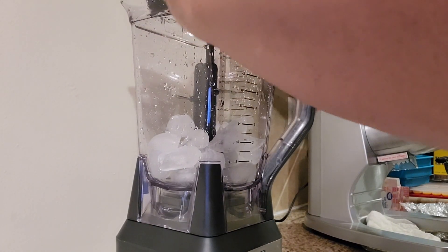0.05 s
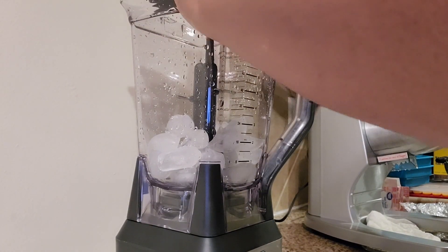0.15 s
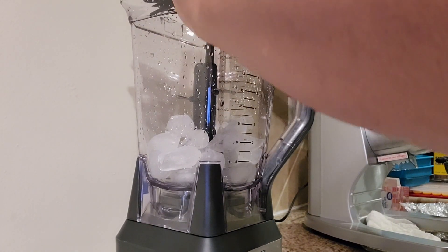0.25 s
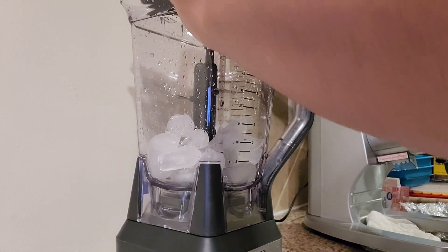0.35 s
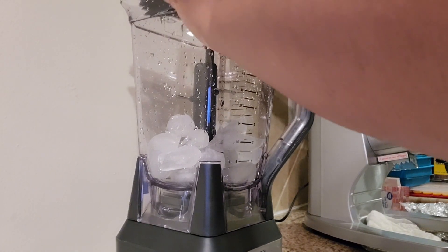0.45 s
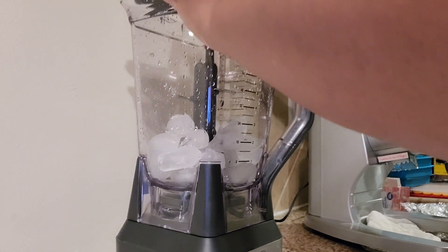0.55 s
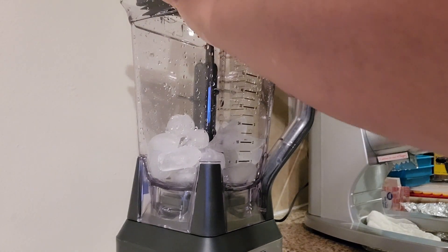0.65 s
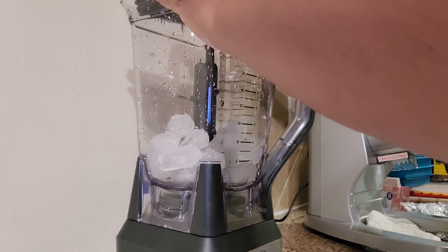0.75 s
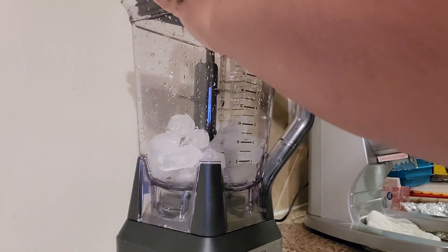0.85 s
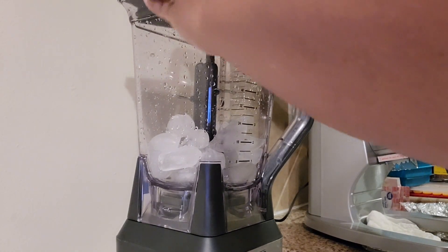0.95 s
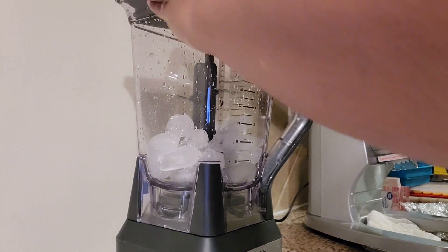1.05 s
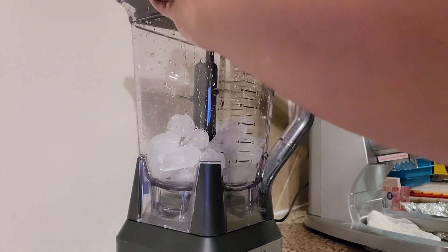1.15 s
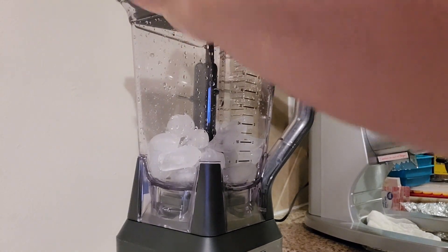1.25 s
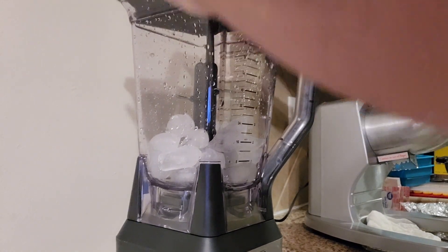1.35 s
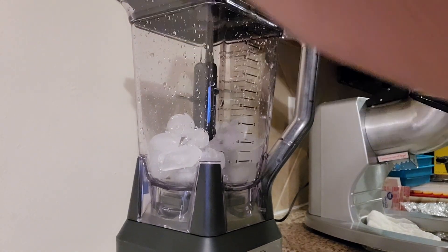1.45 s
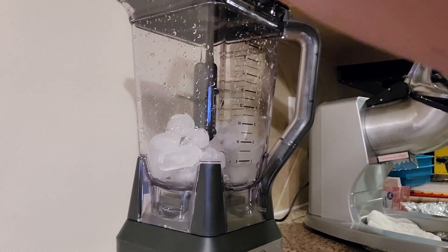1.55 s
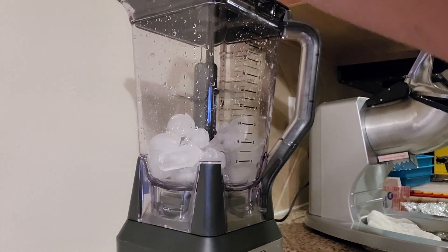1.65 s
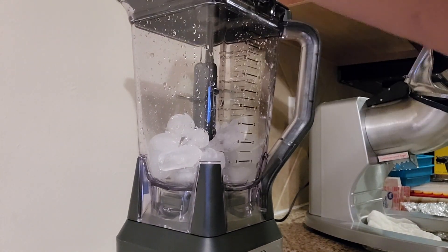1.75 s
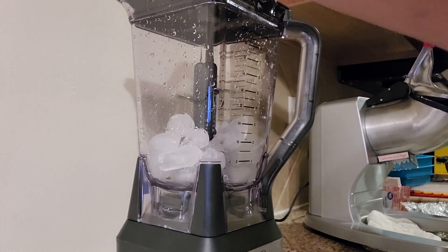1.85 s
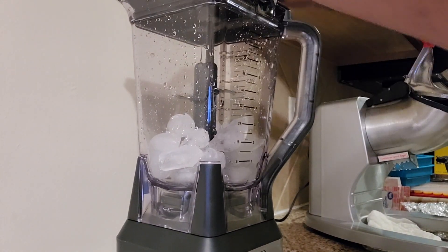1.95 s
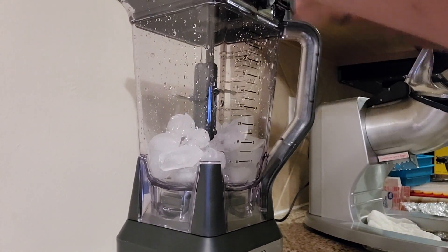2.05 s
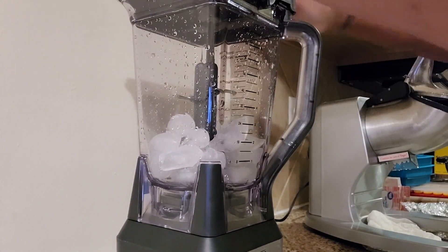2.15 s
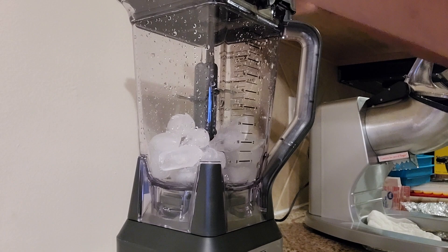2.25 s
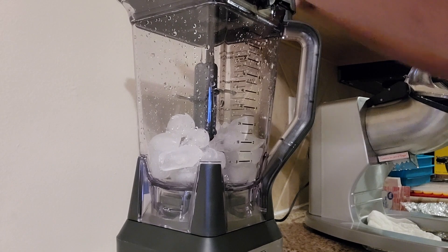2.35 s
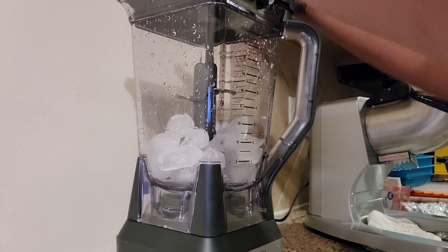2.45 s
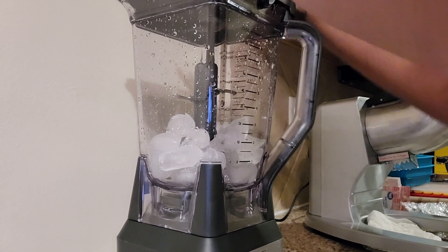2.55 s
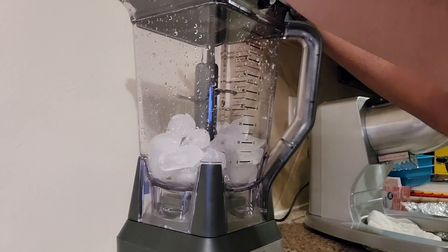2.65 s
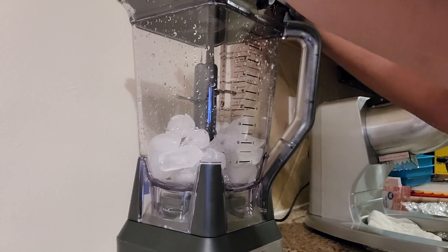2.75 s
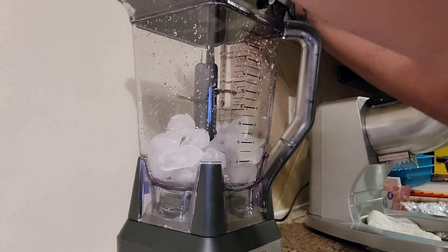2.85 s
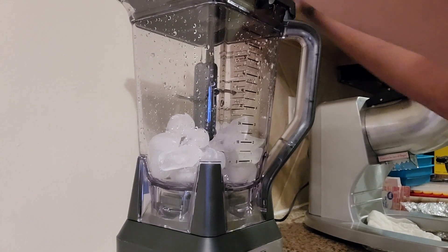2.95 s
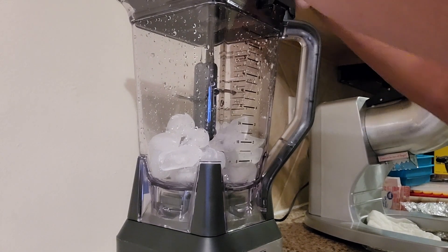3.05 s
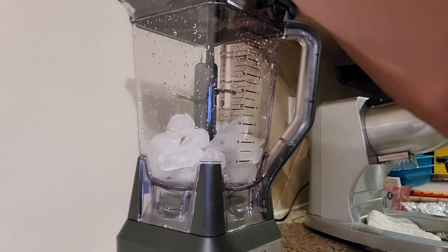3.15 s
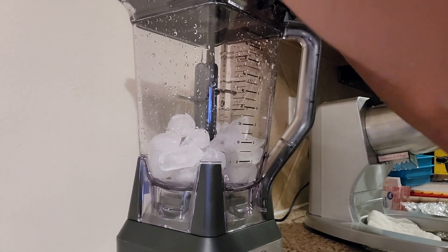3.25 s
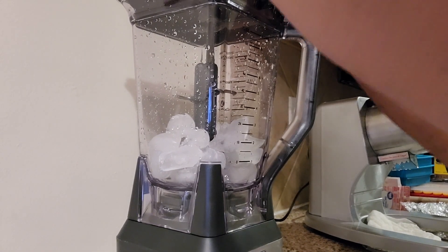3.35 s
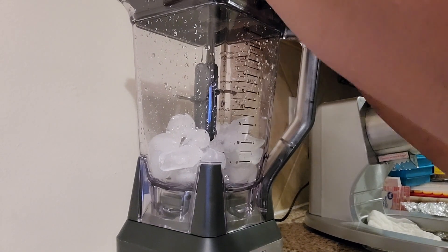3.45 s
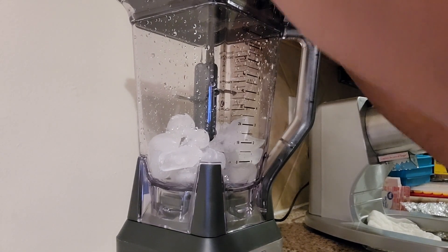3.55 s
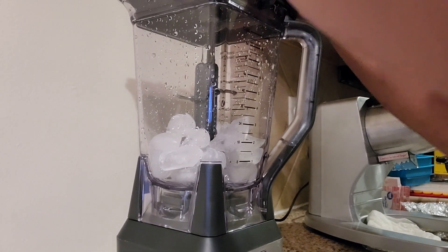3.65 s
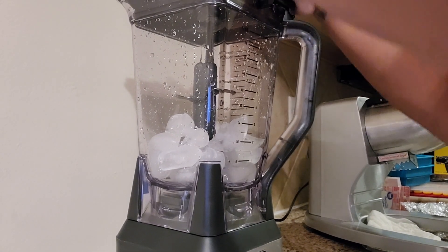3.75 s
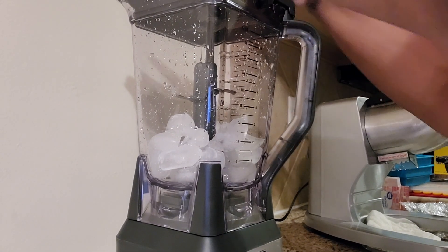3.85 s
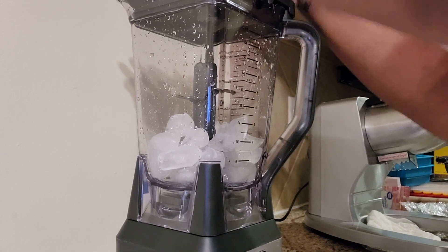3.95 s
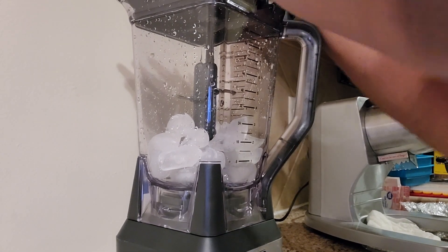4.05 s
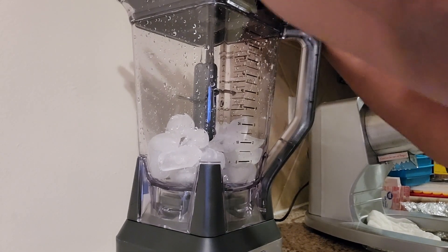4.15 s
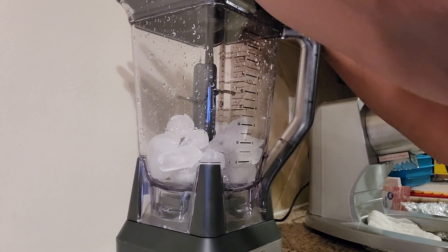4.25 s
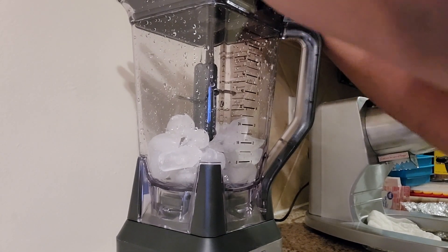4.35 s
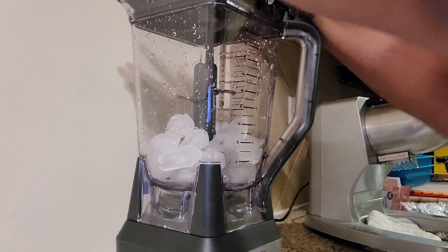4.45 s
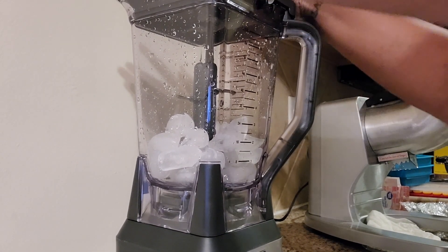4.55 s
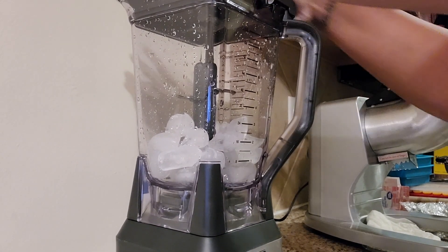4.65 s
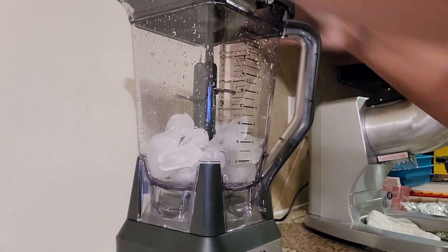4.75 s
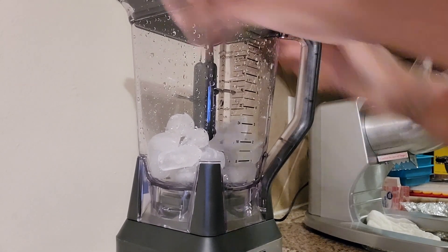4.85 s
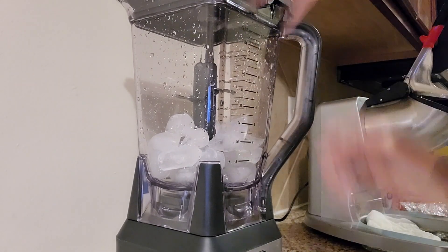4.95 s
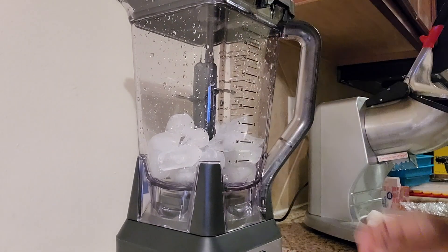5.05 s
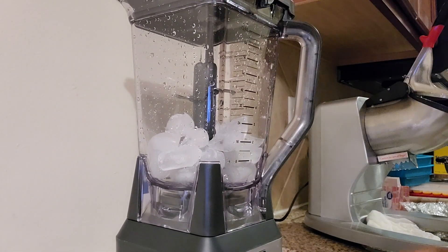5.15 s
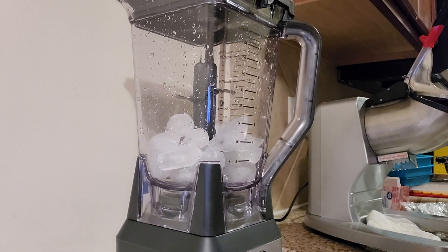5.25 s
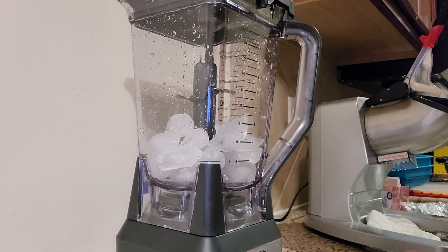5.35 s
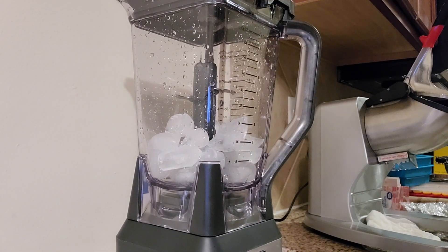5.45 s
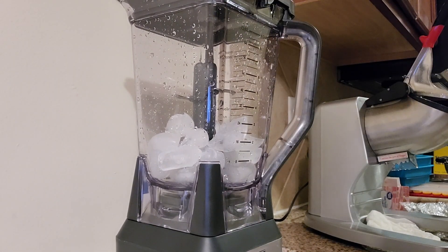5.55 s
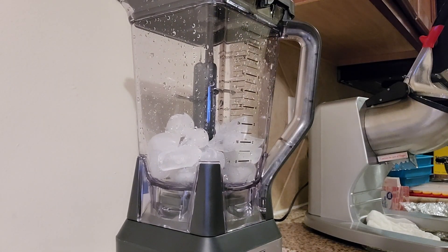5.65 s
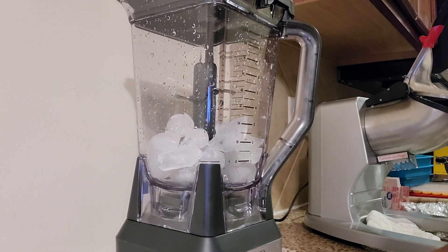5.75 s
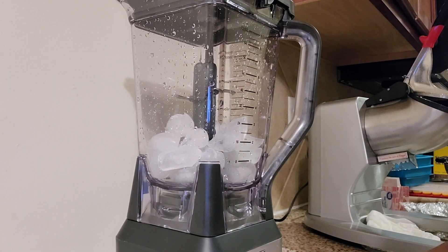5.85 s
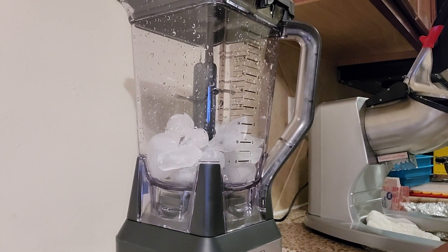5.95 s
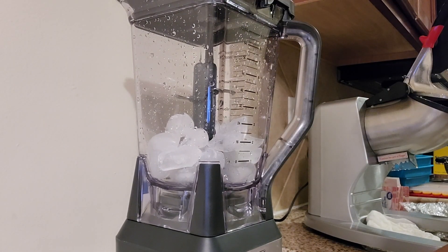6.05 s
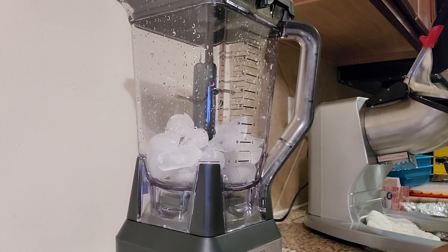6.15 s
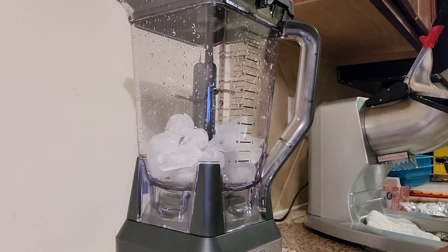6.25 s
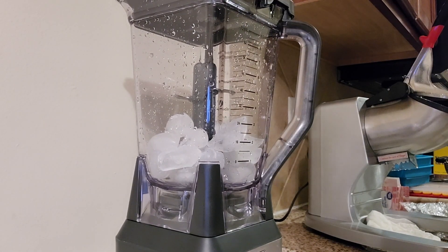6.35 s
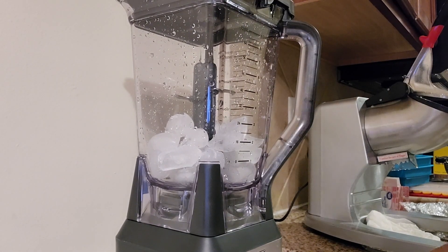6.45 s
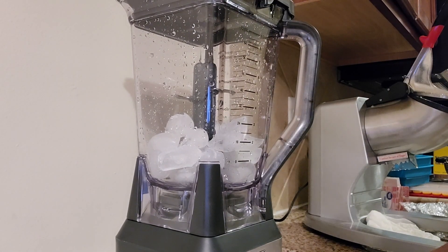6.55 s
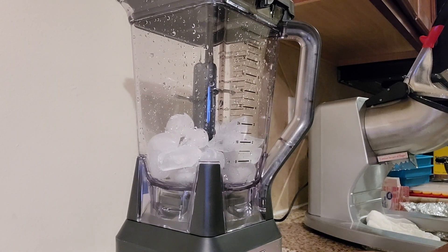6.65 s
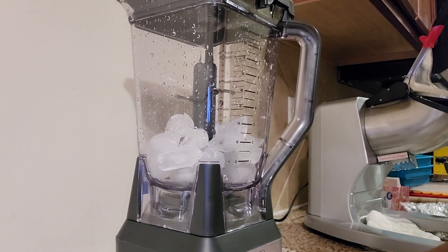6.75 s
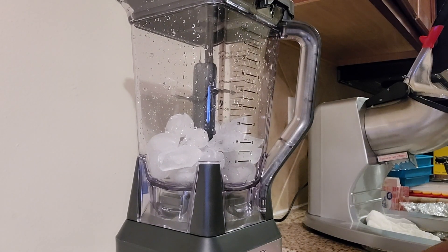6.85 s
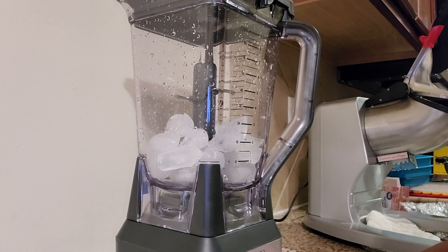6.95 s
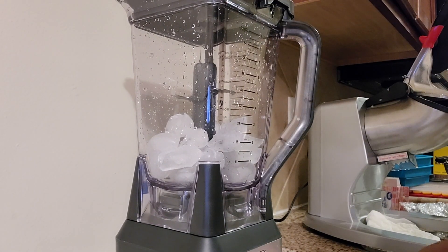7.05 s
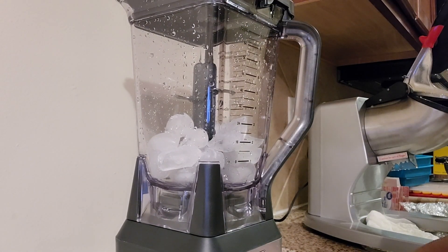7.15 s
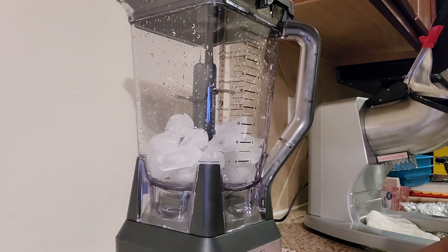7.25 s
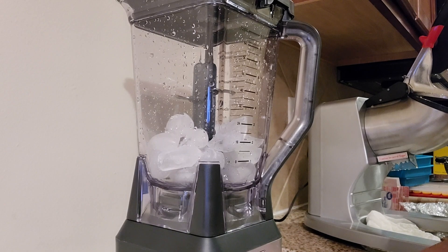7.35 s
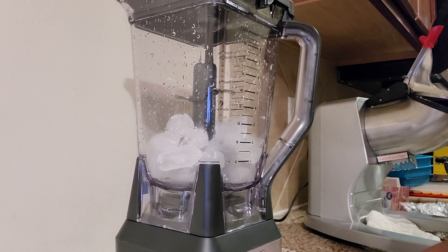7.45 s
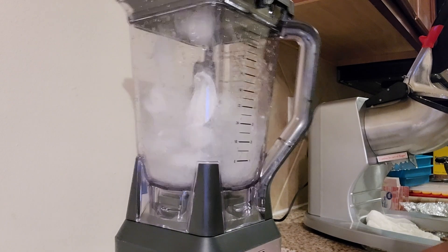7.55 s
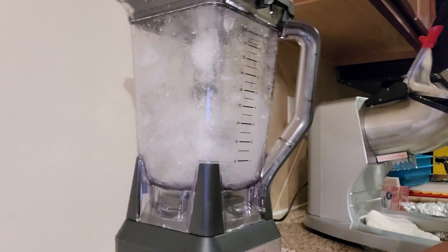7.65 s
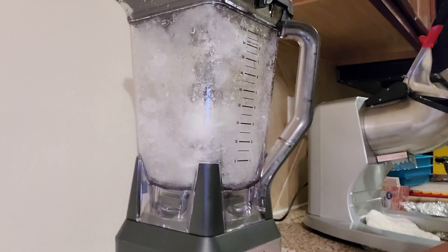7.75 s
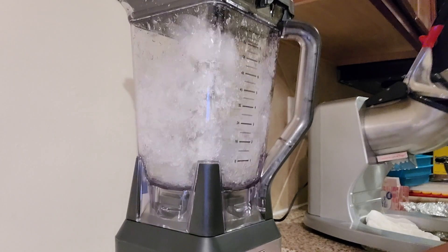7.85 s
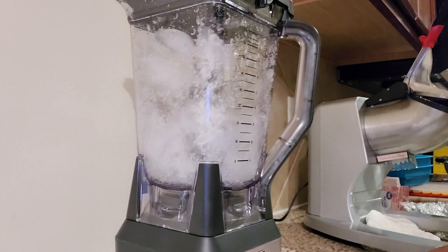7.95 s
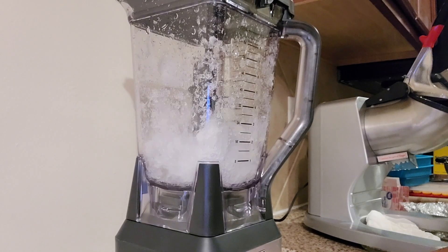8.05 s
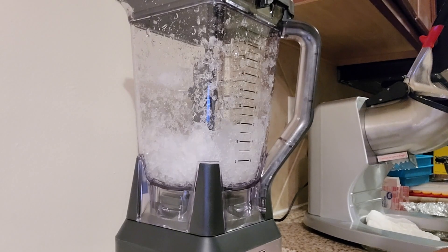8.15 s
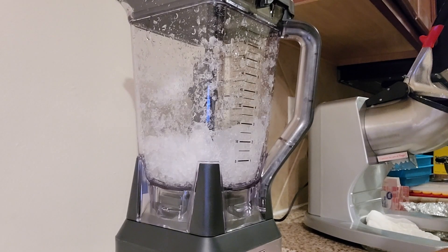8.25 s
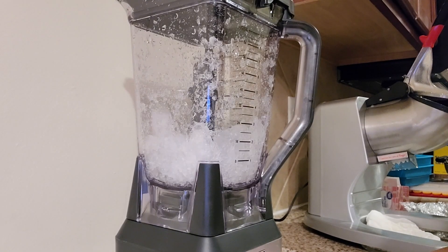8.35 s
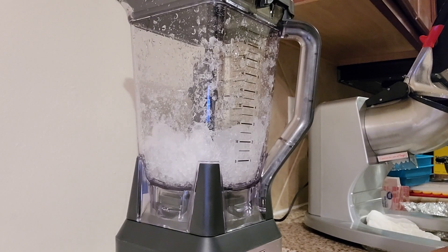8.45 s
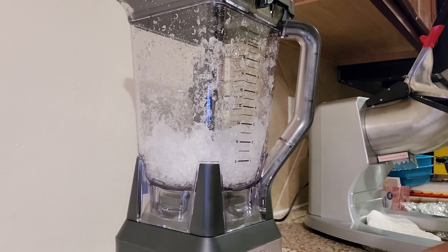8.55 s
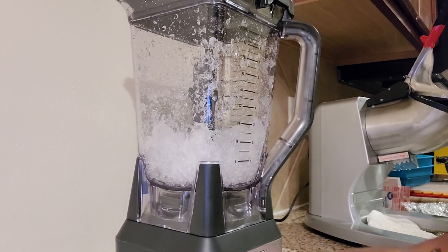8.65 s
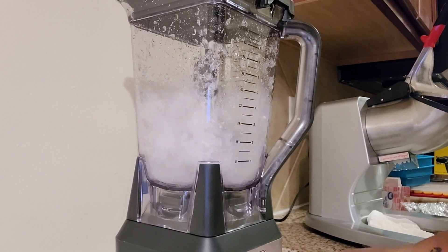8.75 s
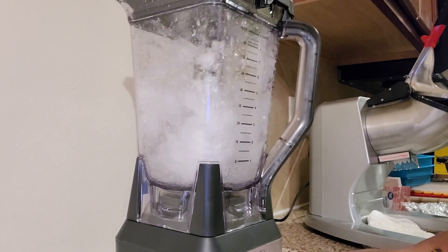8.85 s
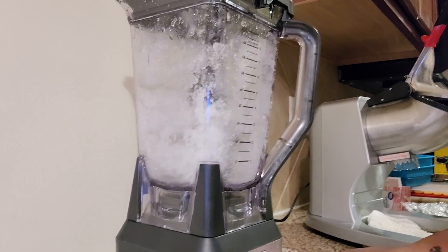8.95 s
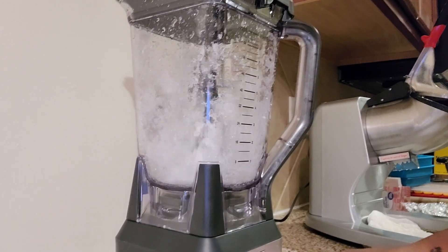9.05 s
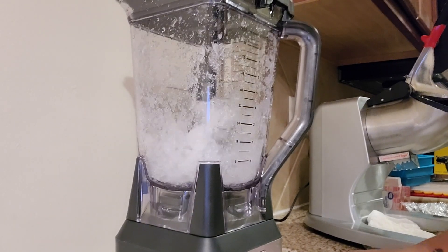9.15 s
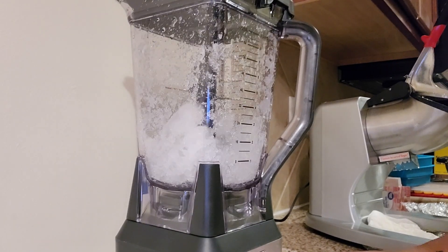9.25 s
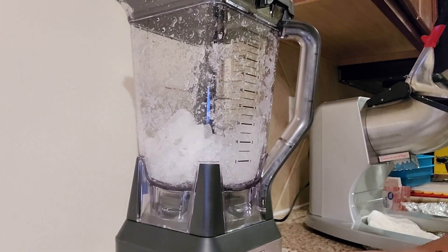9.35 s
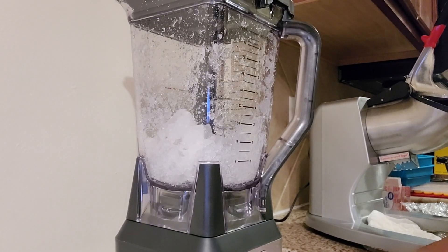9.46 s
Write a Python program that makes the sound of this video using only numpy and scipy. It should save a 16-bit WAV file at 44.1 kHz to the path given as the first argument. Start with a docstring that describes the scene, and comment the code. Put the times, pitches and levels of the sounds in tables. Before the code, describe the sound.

Close stereo view of a blender in a small hard kitchen. Over a low wavering fridge hum, a plastic lid is set down and latched with dull knocks and sharp clacks, with faint ticks and soft footfalls. A quiet pause follows, then button clicks and two brief, loud pulses of ice clattering and crunching against the jar, each coasting down quickly with loose pieces rattling.

```python
"""In a small hard kitchen, a blender stands close by: its plastic lid is seated and latched, things tick, feet thump.
The motor is pulsed twice: random impacts shaped by the jar's resonances make the ice clatter, with short notes
for loose lumps and a sine for the motor's hum. Lid contacts ring damped modes, steps are low damped notes.
A wavering fridge hum and filtered noise lie behind; the overall gain sinks during loud bursts and recovers
slowly after them."""
import sys
import numpy as np
from scipy import signal
from scipy.fft import rfft, irfft, next_fast_len
from scipy.io import wavfile
from scipy.ndimage import uniform_filter1d, map_coordinates

SR = 44100
rng = np.random.default_rng(int(sys.argv[2]) if len(sys.argv) > 2 else 0)


def digitize_waveform(pressure):
    """Quantize a signal to 16-bit integers and store it at the path in sys.argv[1].

    Rows of a 2-D input are taken as channels; values are limited to [-1, 1].
    """
    field = np.atleast_2d(pressure).T
    bounded = np.clip(field, -1, 1)
    quanta = np.round(bounded * 32767).astype(np.int16)
    wavfile.write(sys.argv[1], SR, quanta)


N = 418509  # length in samples
MAINS_HZ = 59.6

# The motor pulses. Each row: full power reached in seconds, power off in seconds, first clatter in relative dB,
# clatter fade in dB per second, first boom in dB above the clatter, motor hum in relative dB,
# jolt of the base in relative dB.
PULSES = [(7.437, 7.944, -8, 37, -8, -18, -16.5), (8.666, 9.079, -12, 58, -1.5, -25.5, 2.5)]


def amp(db):
    """Turns decibels into a plain multiplier."""
    return 10 ** (np.asarray(db) / 20)


def unit(x):
    """Scales a sound to an rms of 1."""
    return x / np.sqrt(np.mean(x ** 2) + 1e-20)


def along(points, hz):
    """Reads a curve of (Hz, value) points, spaced by pitch rather than by plain Hz."""
    point_hz, values = np.transpose(points)
    return np.interp(np.log(hz + 1), np.log(point_hz + 1), values)


def wobble(rate):
    """Makes a smooth random curve with the given number of random points per second."""
    points = rng.standard_normal(int(N * rate / SR) + 4)
    return map_coordinates(points, [np.arange(N) * rate / SR])


def ringing(gain, lo_hz, hi_hz):
    """Makes the response of a body that starts at once (minimum phase), with energy 1, between two soft edges."""
    hz = np.fft.rfftfreq(2 ** 14, 1 / SR)
    edges = 1 / np.sqrt((1 + (lo_hz / (hz + 1)) ** 6) * (1 + (hz / hi_hz) ** 6))
    cepstrum = irfft(np.log(gain(hz) * edges + 1e-6))
    # folding the second half onto the first keeps all sound after the blow
    cepstrum[1:len(hz) - 1] *= 2
    cepstrum[len(hz):] = 0
    pulse = irfft(np.exp(rfft(cepstrum)))[:len(hz) // 2]
    return pulse / np.linalg.norm(pulse)


def through(x, gain, lo_hz=20, hi_hz=20000):
    """Plays a sound through a body that favours some pitches."""
    response = np.atleast_2d(ringing(gain, lo_hz, hi_hz))
    return signal.fftconvolve(x, response, axes=1)[:, :N]


def struck(boom, clatter, crackle, colour, hard_hz):
    """Soft, medium and hard contacts excite the low, middle and high part of a body."""
    low = through(boom, colour, 30, 870)
    middle = through(clatter, colour, 720, hard_hz)
    return low + middle + through(crackle, colour, hard_hz, 24000)


def contact(build, dying, apart):
    """A gritty stereo burst peaking 50 ms in; apart sets how much differs between left and right."""
    t = np.arange(SR // 5) / SR - 1 / 20
    grit_db = 3 * np.repeat(rng.standard_normal(len(t) // 60), 60)
    shared, other = rng.standard_normal((2, len(t))) * amp(grit_db)
    rise = np.exp(t / np.clip(build, 1e-4, .02))
    fall = amp(-60 * t / np.clip(dying, .002, .2))
    return (shared + apart * np.outer([1, -1], other)) * np.where(t < 0, rise, fall)


def blows(rows):
    """Lays contacts on boom, clatter and crackle tracks: lower parts of a blow are more alike left and right."""
    tracks = np.zeros((3, 2, N + SR))
    for s, db, boom_db, crackle_db, build, dying in rows:
        start = round(s * SR) - SR // 20
        for track, level_db, apart in zip(tracks, (boom_db, 0, crackle_db), (.15, .45, .9)):
            burst = amp(db + level_db) * contact(build, dying, apart)
            track[:, start:start + burst.shape[1]] += burst
    return tracks[..., :N]


def hail(rate, spread_db, apart, clumps_db):
    """Random impacts of very uneven size, so many a second, coming in clumps; rms 1."""
    hits = rng.random(N) < rate / SR
    sizes = hits * amp(spread_db * rng.exponential(size=N) + clumps_db * wobble(35))
    shared, other = sizes * rng.standard_normal((2, N))
    return unit(shared + apart * np.outer([1, -1], other))


def add_note(out, s, db, hz, t60, rise):
    """Adds one damped note that swells over the rise time and falls 60 dB in t60 seconds."""
    start = round(s * SR)
    t = np.arange(min(int(t60 * SR) + SR // 50, N - start)) / SR
    drift = uniform_filter1d(rng.standard_normal(len(t)), size=int(SR / hz))
    turn = 2 * np.pi * hz * t + 0.22 * np.sqrt(hz / SR) * np.cumsum(drift)  # never quite pure
    out[..., start:start + len(t)] += amp(db - 60 * t / t60) * (1 - np.exp(-t / rise)) * np.sin(turn)


def blender():
    """Blades throw a hail of ice at the jar; the motor hums near twice the mains rate."""
    # Large ice pieces striking the jar. Each row: start in seconds, wall blow in relative dB,
    # crackle in dB above the blow, pitch of the piece in Hz.
    ice = [(7.436, -14.5, -9.5, 362), (7.45, -7, -5.5, 1370), (7.486, -6, 0, 1430), (7.521, -8, -22, 630),
           (7.577, 0, -9.5, 1350), (7.609, -8, -21, 766), (7.645, -3, -10, 1360), (7.681, -22, -1, 1330),
           (7.736, -27, 5, 476), (7.759, -17, -30.5, 243), (7.79, -10.5, -9, 1330),
           (7.843, -13.5, -2.5, 700), (7.858, -27, -1, 1350), (7.925, -21.5, -8.5, 1105),
           (7.958, -30, -20, 648), (8.03, -20, -4, 1190), (8.053, -31, 2, 1410), (8.108, -21, -4, 1320),
           (8.217, -20.5, -26.5, 1105), (8.302, -20.5, -12.5, 550), (8.333, -22.5, -12, 1077),
           (8.358, -37, -2.5, 750), (8.68, -7.5, -9, 1410), (8.7, -6, -4, 684), (8.725, -23, -12, 1270),
           (8.743, -10.5, -27.5, 310), (8.758, -7, -37.5, 1300), (8.825, -6.5, -6, 1300),
           (8.895, -14.5, -10.5, 508), (8.928, -15.5, -11.5, 386), (8.958, -19.5, -29, 752),
           (8.997, -14, -4.5, 1120), (9.067, -19, -11, 1420), (9.172, -33.5, 0, 1310),
           (9.201, -30, -23.5, 1460)]
    full_s, off_drop_db = 0.064, 7.5  # time at full clatter; clatter lost at power off
    first_crackle_db, crackle_fades_db_per_s = 1, 11  # above the clatter; fewer cubes left to split
    hum_fades_db_per_s, hum_drop_db = 5, 10
    boom_settles_db, boom_settles_s = 4.5, 0.24  # above the clatter, once the cubes turn to slush
    ice_boom_db, ice_dying_s = -8, 0.025  # low push above the blow; fall of a contact by 60 dB
    ice_note_db, ice_note_cycles = 4.5, 28  # a piece's own notes above the blow; their life

    tracks = blows([(s, db, ice_boom_db, crackle_db, .0008, ice_dying_s) for s, db, crackle_db, hz in ice])
    boom_hail = hail(250, 1.6, 0.26, clumps_db=2)
    clatter_hail = hail(500, 1.8, .3, clumps_db=2)
    crackle_hail = hail(2800, 1.8, 0.97, clumps_db=2)
    hails = boom_hail, clatter_hail, crackle_hail
    thuds = chunks(120, 329.2, 0.44, cycles=11)
    lumps = chunks(250, 1262.0, 0.4276, cycles=22)
    splinters = chunks(400, 4220, .45, cycles=33)
    # dead blows suck the wall in first, hence the minus
    knocks = -through(chunks(110, 600, .4, cycles=3.7), np.ones_like, lo_hz=150)
    hum = np.sin(2 * np.pi * np.cumsum(2 * MAINS_HZ + 7 * wobble(12)) / SR)

    loose, slush = np.zeros((2, N)), np.zeros(N)
    for on, off, first_db, fades_db, cubes_db, hum_db, jolt_db in PULSES:
        run = np.clip(np.arange(N) / SR - on, 0, off - on)  # seconds under full power
        db = first_db - fades_db * np.clip(run - full_s, 0, None) + power_db(on, off, off_drop_db)
        db += 1.2 * wobble(28)  # the ice meets the blades in clumps
        # slush cakes the wall and is partly flung off at the next start
        slush = np.where(run > 0, 0.74 * slush + run / (off - on), slush)
        boom_db = boom_settles_db + (cubes_db - boom_settles_db) * np.exp(-run / boom_settles_s)
        crackle_db = first_crackle_db - crackle_fades_db_per_s * run
        tracks += amp(db - 5.0 + np.array([boom_db, 0 * db, crackle_db]))[:, None] * hails
        loose += amp(db - 16.0) * lumps
        loose += amp(db + boom_db - 11) * thuds
        loose += amp(db + crackle_db - 16.5) * splinters
        loose += amp(db - 17) * knocks
        hum_level_db = hum_db - hum_fades_db_per_s * run + power_db(on, off, hum_drop_db) + 5.7 * wobble(22)
        loose += amp(hum_level_db) * hum * (1 - np.exp(-run / 0.028))
        for hz in (140, 245):  # the base jolts as the motor bites
            add_note(loose, on - .006, jolt_db, hz, t60=13 / hz, rise=0.011)

    for s, db, _, hz in ice:
        for ratio in (1, *np.exp(rng.normal(0, 0.3135, size=3))):  # a lump has a few unrelated notes
            note_db = db + ice_note_db - 9.2 * (ratio != 1) + rng.normal(0, 2.9)
            add_note(loose, s, note_db, hz * ratio, t60=ice_note_cycles / (hz * ratio), rise=0.004)

    sway = np.clip(.6 * slush ** 2 + .35 * wobble(16), 0, 1)  # share of the blows that meet a loaded wall
    # ice lying on the wall lowers and damps its resonances
    loaded = struck(*tracks * np.sqrt(sway), lambda hz: jar(hz * 1.03, damping=3), 2800)
    bare = struck(*tracks * np.sqrt(1 - sway), jar, 2700)
    return loaded + bare + loose


def power_db(on, off, drop_db):
    """The blades spin up just before the on time, are full there, then drop and coast to silence after off."""
    spin_up_s, spin_down_s, coast_db_per_s = 0.031, 0.052, 91.5  # rise by 60 dB, drop, then coast
    t = np.arange(N) / SR
    rise = 60 * np.clip((t - on) / spin_up_s, None, 0)
    drop = drop_db * np.clip((t - off) / spin_down_s, 0, 1)
    return rise - drop - coast_db_per_s * np.clip(t - off - spin_down_s, 0, None)


def chunks(rate, hz, spread, cycles):
    """Tumbling lumps: each rings briefly at its own pitch, from its own side; rms 1."""
    first_s = PULSES[0][0]
    pitch_draw, level_draw, side_draw = rng.standard_normal((3, int(rate * (N / SR - first_s))))
    samples = np.arange(SR // 30)
    start = rng.integers(int(first_s * SR) - SR // 20, N, len(pitch_draw))[:, None] + samples
    pitch = hz * np.exp(spread * pitch_draw)
    turns = pitch[:, None] * samples / SR
    ring = amp(3.5 * level_draw[:, None] - 60 * turns / cycles)
    lead = .00008 * (side_draw * pitch)[:, None]  # nearer one side: a small delay, in turns
    sides = [ring * np.sin(2 * np.pi * (turns + way * lead)) for way in (1, -1)]
    return unit(np.array([np.bincount(start.ravel(), side.ravel(), N + SR)[:N] for side in sides]))


def jar(hz, damping=1):
    """The jar wall: a broad colour plus resonance peaks, wider and lower when damped."""
    # Resonances of the wall. Each row: centre in Hz, undamped width in Hz, undamped level in relative dB.
    wall_peaks = [(238, 17, -15), (432, 73, -3), (696, 37, -3.5), (1146, 39, -10), (1361, 41, -3),
                  (3210, 160, -23.5), (6630, 750, -25.5)]
    # The jar between its resonances. Each row: pitch in Hz, level in relative dB per Hz.
    wall_colour = [(45, -29.5), (113, 8), (580, -6.5), (900, -22), (1600, -8), (2400, -15), (4500, -22),
                   (9000, -41.5), (12000, -27.5), (16200, -55.5)]
    peaks = sum(amp(db) ** 2 / damping / (1 + (2 * (hz - centre) / width / damping) ** 2)
                for centre, width, db in wall_peaks)
    return np.sqrt(peaks + amp(along(wall_colour, hz) - 12.5) ** 2)


def hands():
    """Plastic contacts ring the lid's modes, and sliding fingers make soft high noise."""
    # Lid and latch contacts. Each row: start in seconds, blow in relative dB, crackle in dB above the blow,
    # build-up in seconds, dying in seconds, ring in relative dB, pitch the contact favours in Hz,
    # factor on the ring time (below or above 1).
    lid_contacts = [(0.906, -34.5, -4.5, 0.0022, 0.026, -19.5, 286, 0.91),
                    (0.981, -32.5, -17, 0.0022, 0.0381, -18, 289, 0.79),
                    (0.989, -51, -15.5, 0.0031, 0.032, -23.5, 560, 1.26),
                    (1.209, -34.5, 7, 0.0014, 0.023, -17, 188, 0.96),
                    (1.329, -37, -19.5, 0.0041, 0.15, -19.5, 124, 0.54),
                    (1.355, -32, 3.5, 0.0043, 0.013, -15, 673, 1),
                    (1.363, -23, -19.5, 0.0094, 0.023, -21.5, 1510, .9),
                    (2.011, -21.5, 6.5, 0.0029, 0.045, -12, 460, .6),
                    (2.016, -40.5, -7, .002, .04, -21.5, 1650, 1.2),
                    (2.486, -35, -10, 0.0054, 0.13, -24, 600, 0.98),
                    (2.512, -16, -13.5, 0.0038, 0.036, -11, 1330, 0.83)]
    # Sleeve and fingers sliding. Each row: middle in seconds, level in relative dB,
    # length of the swell in seconds (the fall takes half of it).
    rubs = [(1.167, -49, 0.054), (4.63, -65.5, 0.099), (6.88, -64.5, 0.07)]
    # Colour of the struck lid. Each row: pitch in Hz, level in relative dB per Hz.
    lid_colour = [(130, -6), (300, -4.5), (680, -7), (1200, -10), (2000, -9), (3000, -9), (4500, -18),
                  (7000, -10), (9000, -25), (12000, -24), (16200, -45.5)]
    # Colour of the sliding. Each row: pitch in Hz, level in relative dB per Hz.
    skin_colour = [(4500, -13.5), (6500, -13), (9000, -22), (16000, -28.5)]
    # The lid on the empty jar. Each row: mode in Hz, level in relative dB, 60 dB fall in seconds
    # before the contact's factor.
    lid_modes = [(124, 2.5, 0.42), (189, 7, 0.12), (265, 3, 0.11), (458.4, -1, 0.077), (550.4, -7, 0.19),
                 (684.4, -1, 0.074), (836, -10.5, 0.058), (1204, 3, 0.034), (1475, 2, 0.031),
                 (1643, -2.5, 0.081), (1838, 2.5, 0.049), (2370, -6, .05), (3000, -9, 0.11)]
    boom_db_per_octave, boom_even_hz = 7.5, 258  # low contacts push more; here boom equals blow
    favours_db_per_octave, far_modes_octaves = 23.5, 0.98  # modes fade away from the favoured pitch, up to here

    rows = [(s, db, boom_db_per_octave * np.log2(boom_even_hz / hz), crackle_db, build, dying)
            for s, db, crackle_db, build, dying, _, hz, _ in lid_contacts]
    lid = struck(*blows(rows), lambda hz: amp(along(lid_colour, hz)), 5000)
    for s, *_, ring_db, favoured_hz, ring_factor in lid_contacts:
        for hz, db, t60 in lid_modes:
            octaves = min(abs(np.log2(hz / favoured_hz)), far_modes_octaves)
            mode_db = ring_db + db - favours_db_per_octave * octaves
            add_note(lid, s, mode_db, hz, t60 * ring_factor, rise=1.2 / hz)  # low modes swell later
    t = np.arange(N) / SR
    slide = sum(amp(db) * np.exp(-((t - s) / length * np.where(t > s, 2, 1)) ** 2) for s, db, length in rubs)
    rough = slide * hail(8000, 1.4, 0.94, clumps_db=1.6)
    return lid + through(rough, lambda hz: amp(along(skin_colour, hz)), lo_hz=3000)


def ticks():
    """Short contacts, each with a resonance, its overtone and a broad snap."""
    # Small ticks and button clicks. Each row: start in seconds, peak in relative dB, resonance in Hz
    # (set 1 % lower below), width in octaves, broad snap in relative dB under the resonance.
    clicks = [(0.374, -29, 1270, .2, 3), (2.388, -40.5, 1700, 0.63, 37), (2.857, -35.5, 6900, 0.48, 23),
              (3.693, -42, 7100, 0.34, 31), (4.117, -37, 1650, 0.2, 34), (4.512, -41, 7000, 0.3, 35),
              (6.173, -43.5, 6370, 0.95, 25), (6.274, -29, 2480, 0.14, 14), (7.328, -26.5, 2840, .5, 1),
              (7.375, -22.5, 6560, .4, 7.5), (8.601, -33.5, 6200, 1.9, 8), (9.46, -28.5, 5640, 4.7, 15)]
    out = np.zeros((2, N + SR))
    for s, db, centre_hz, octaves, under_db in clicks:
        def peak(hz, ratio):
            return 1 / (1 + (2 * np.log2((hz + 1) / (ratio * centre_hz)) / octaves) ** 2)

        def tick_colour(hz):
            snap = 2200 / (hz + 300) + 1.5 * peak(hz, 1.43)
            return peak(hz, 0.99) + amp(-under_db) * snap

        touch = contact(0.00068, 0.016, 0.74)
        touch[:, SR // 20] += 3.5  # one clean edge at the peak of the grit
        tick = signal.fftconvolve(touch, ringing(tick_colour, 300, 6900)[None], axes=1)
        tick *= amp(db) / np.abs(tick).max()
        out[:, round(s * SR) - SR // 20:][:, :tick.shape[1]] += tick
    return out[:, :N]


def steps():
    """The floor flexes under each step and shakes the counter, as a low damped note."""
    # Steps on the floor. Each row: start in seconds, level in relative dB, pitch in Hz.
    footfalls = [(2.31, -19.5, 59.2), (2.813, -8, 63.6), (2.928, -24, 45.5), (3.342, -20, 60.6)]
    floor = np.zeros(N)
    for s, db, hz in footfalls:
        add_note(floor, s, db, hz, t60=0.16, rise=0.014)
    return floor


def room(x):
    """Near surfaces answer quickly, far walls ring on weakly; the tail is drawn anew every quarter second."""
    # Dying time of the near surfaces. Each row: pitch in Hz, 60 dB fall in seconds.
    near_t60 = [(100, 0.057), (700, 0.12), (2000, 0.088), (6000, 0.093), (13000, 0.061)]
    out, hop = np.zeros((2, N + 2 * SR)), SR // 4
    for start in range(0, N, hop):
        hz, t, z = signal.stft(rng.standard_normal((2, SR // 2)), SR, nperseg=256)
        z[1] = np.where(hz[:, None] < 700, z[0], z[1])  # long waves reach both sides alike
        fall_db = -60 * t / along(near_t60, hz)[:, None]
        far = amp(fall_db / 6.16 - 17.5)
        z *= (amp(fall_db) + far) * np.clip(hz / 900, .1, 1)[:, None]
        tail = signal.istft(z, SR, nperseg=256)[1]
        wet = signal.fftconvolve(x[:, start:start + hop], tail / np.linalg.norm(tail[0]), axes=1)
        out[:, start + 150:start + 150 + wet.shape[1]] += wet  # the answer comes 150 samples late
    return out[:, :N]


def kitchen():
    """The fridge hums as a wavering sine at the mains rate, over steady noise for the air of the room."""
    # The hum wavers. Each row: time in seconds, level in relative dB.
    hum_levels = [(0, -48), (.5, -42), (2.6, -41.5), (3.2, -59), (3.9, -48), (4.5, -43.5), (9.49, -43.5)]
    # Room air and fridge fan. Each row: pitch in Hz, level in relative dB per Hz.
    air_colour = [(22, -17.5), (45, -1.5), (85, -1.5), (170, -13.5), (255, -9.5), (330, -15), (520, -13.5),
                  (820, -18), (960, -24), (4000, -35), (5000, -39), (7000, -39.5), (9500, -56),
                  (16200, -63)]
    # How alike left and right are. Each row: pitch in Hz, likeness from 0 to 1.
    likeness = [(60, 0.939), (180, 0.94), (550, 0.46), (900, 0.015)]
    air_db = -47
    t = np.arange(N) / SR
    hum_db = np.interp(t, *np.transpose(hum_levels)) + 2.7 * wobble(7.3)
    hum = amp(hum_db) * np.sin(2 * np.pi * MAINS_HZ * t + 0.2 * wobble(18))
    size = next_fast_len(N)
    hz = np.fft.rfftfreq(size, 1 / SR)
    turn = np.arccos(np.clip(along(likeness, hz), 0, 1)) / 2  # splits noise into shared and opposite parts
    noise = rfft(rng.standard_normal((2, size))) * amp(along(air_colour, hz))
    mid, side = irfft(noise * [np.cos(turn), np.sin(turn)], size)[:, :N]
    return hum + amp(air_db) * unit(np.array([mid + side, mid - side]))


def scene():
    """Near sources with their room answer, over the steps and the kitchen's background."""
    near = blender() + hands() + ticks()
    return near + amp(-4.0) * room(near) + steps() + kitchen()


def record(dry):
    """Slow gain control driven by recent power, then soft clipping and a limit on the treble."""
    memory_s, threshold_db, top_hz = .35, -32.0, 15850
    keep = np.exp(-1 / (memory_s * SR))
    recent_power = signal.lfilter([1 - keep], [1, -keep], np.mean(dry ** 2, 0))
    recent_db = 10 * np.log10(recent_power + 1e-12)
    x = dry * amp(-.3 * np.clip(recent_db - threshold_db, 0, None))  # 0.3 dB down per dB above
    x = x / (1 + np.abs(x / .9) ** 6) ** (1 / 6)  # peaks bend towards 0.9
    return signal.sosfiltfilt(signal.ellip(10, .1, 90, top_hz, fs=SR, output="sos"), x)


dry = scene()
out = record(dry)
digitize_waveform(out)
```